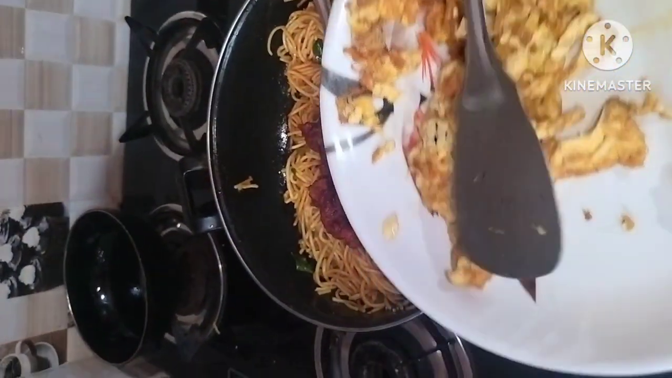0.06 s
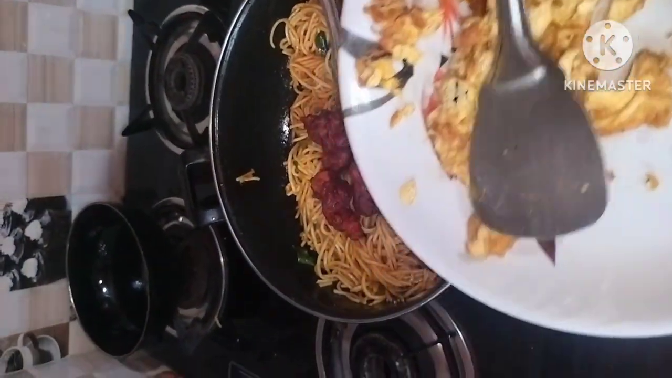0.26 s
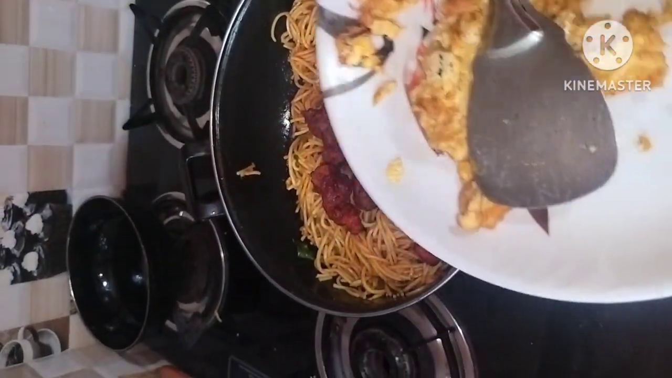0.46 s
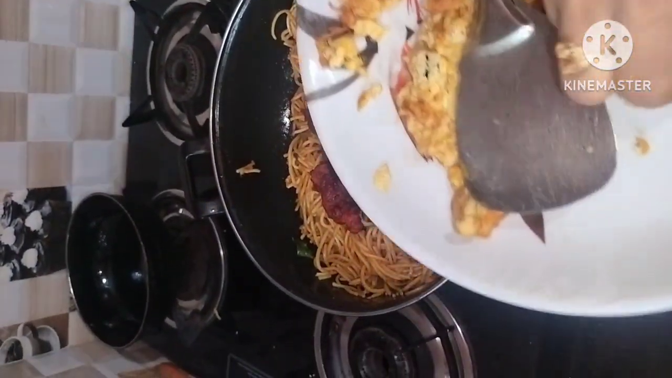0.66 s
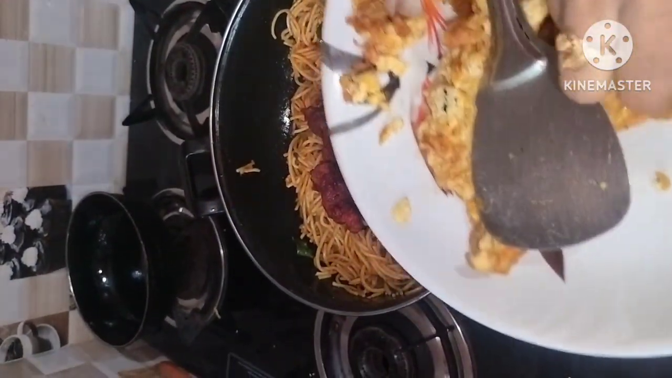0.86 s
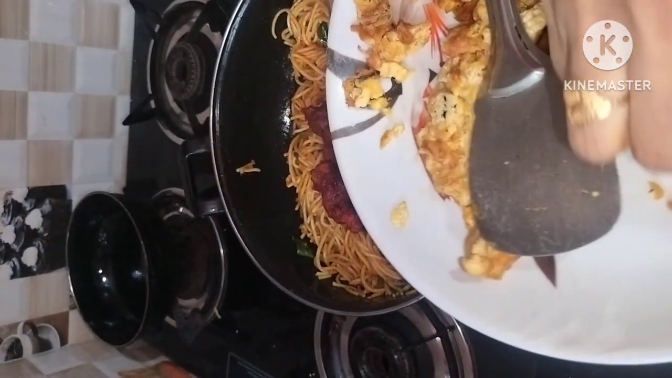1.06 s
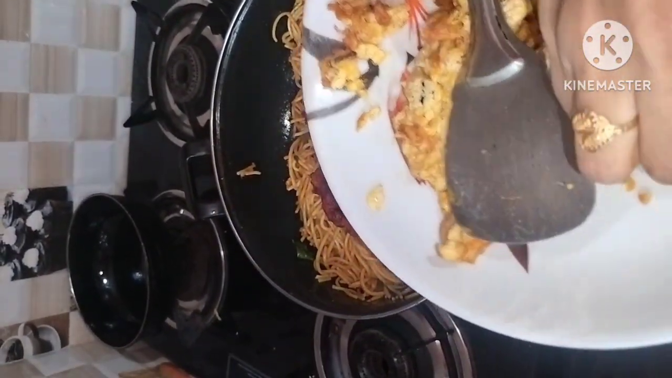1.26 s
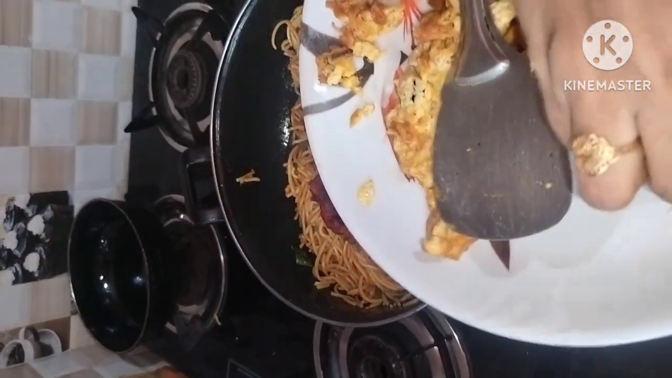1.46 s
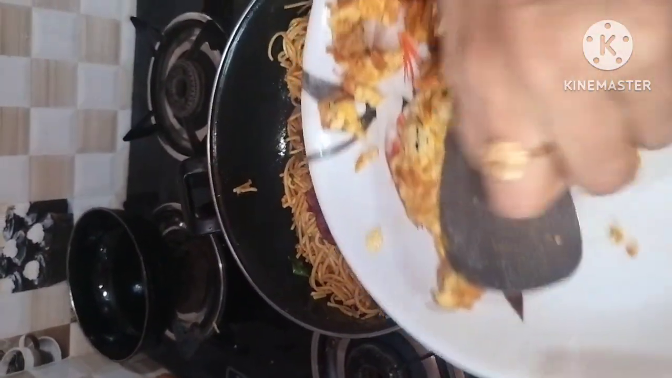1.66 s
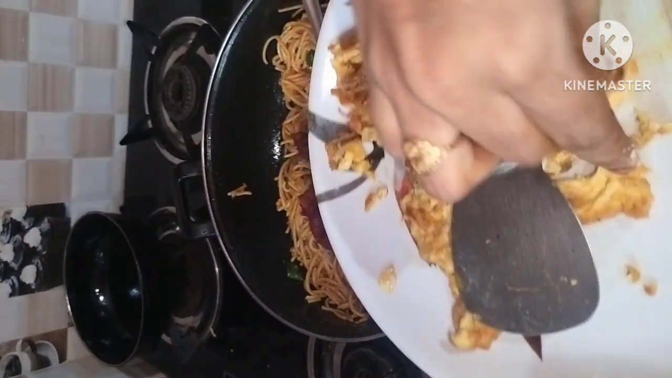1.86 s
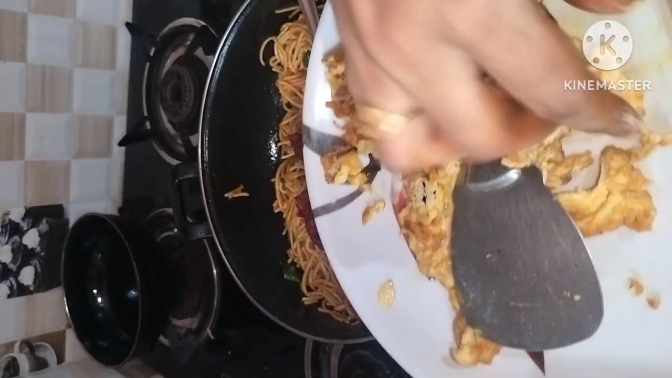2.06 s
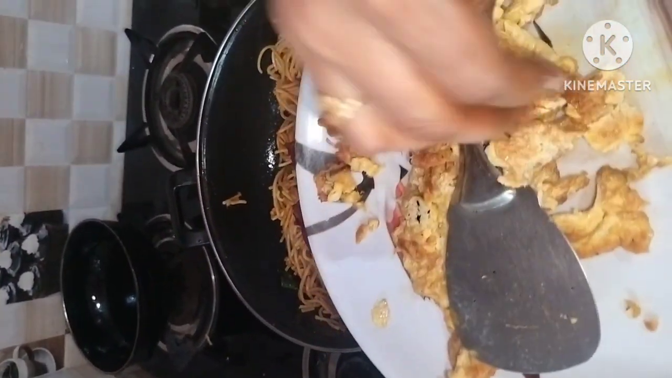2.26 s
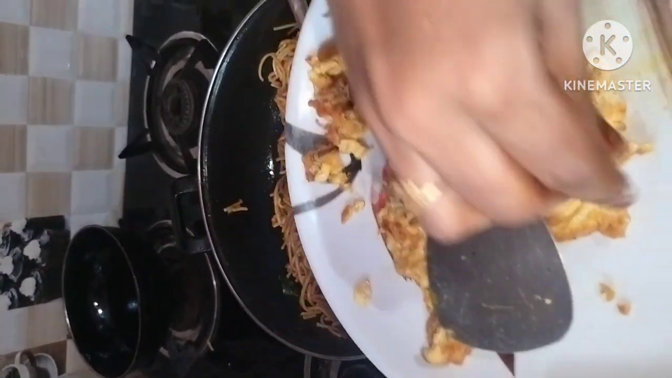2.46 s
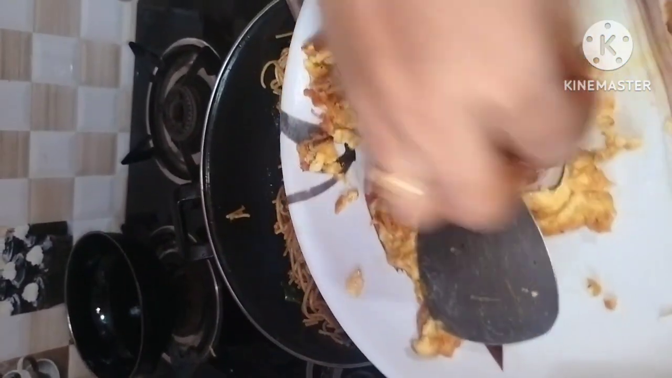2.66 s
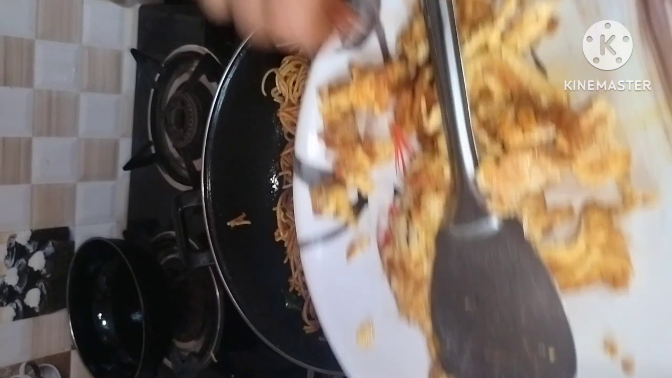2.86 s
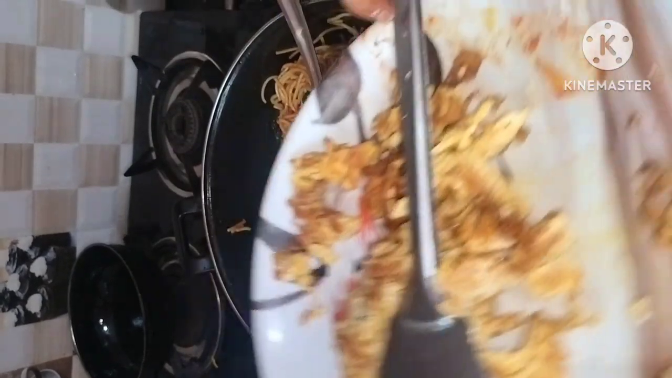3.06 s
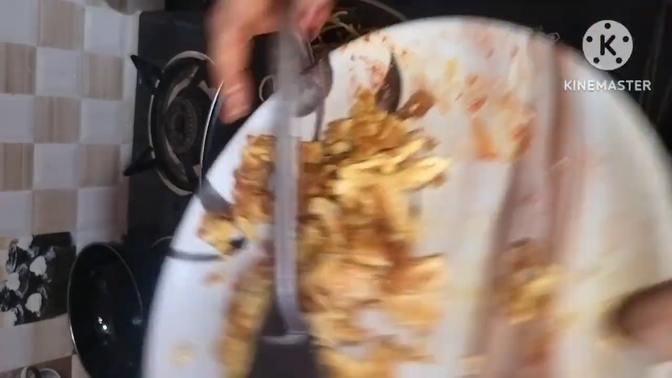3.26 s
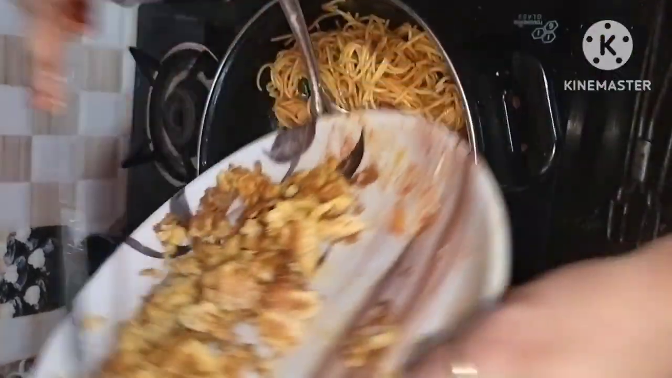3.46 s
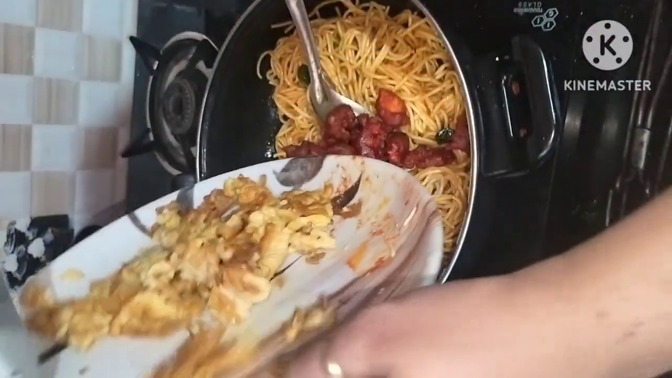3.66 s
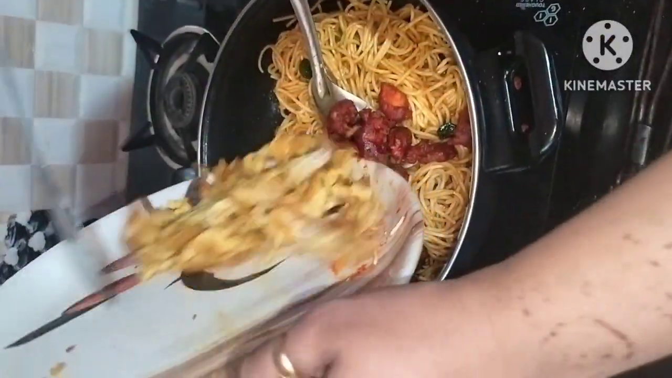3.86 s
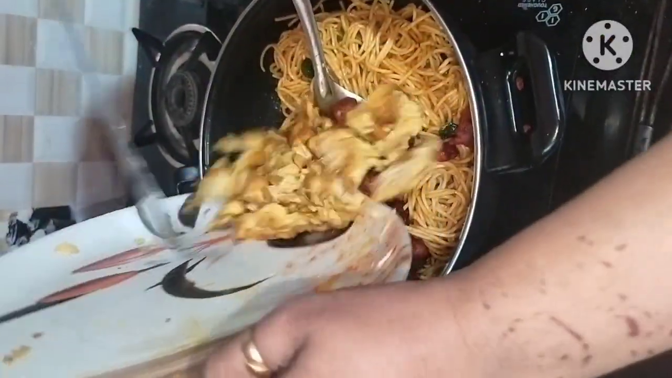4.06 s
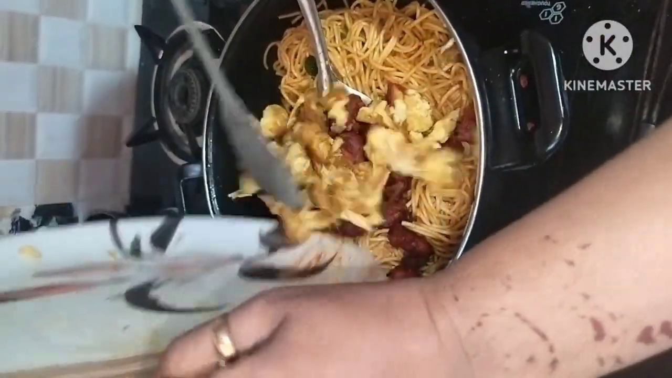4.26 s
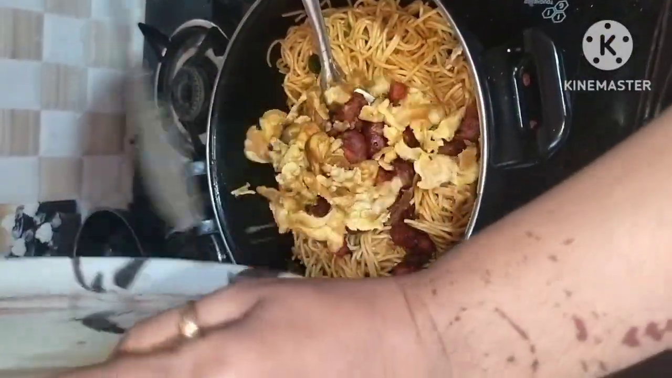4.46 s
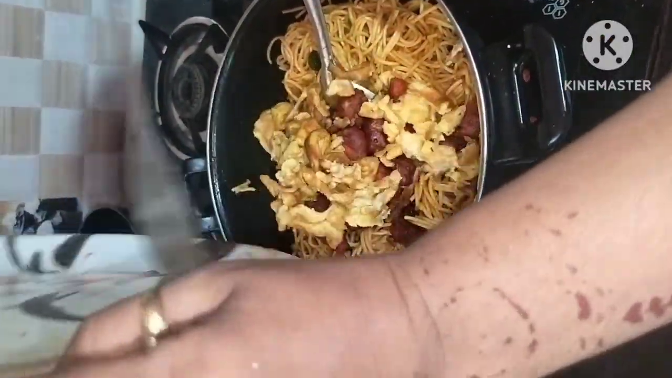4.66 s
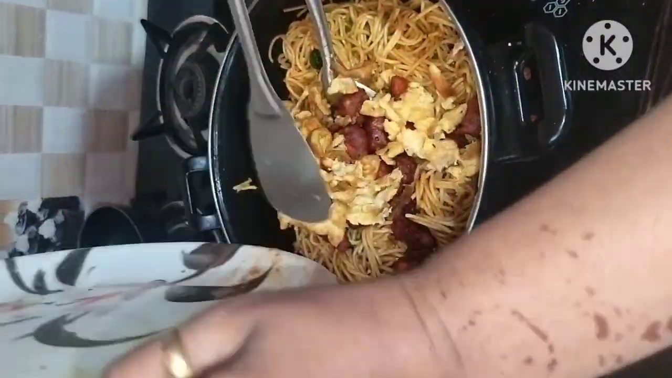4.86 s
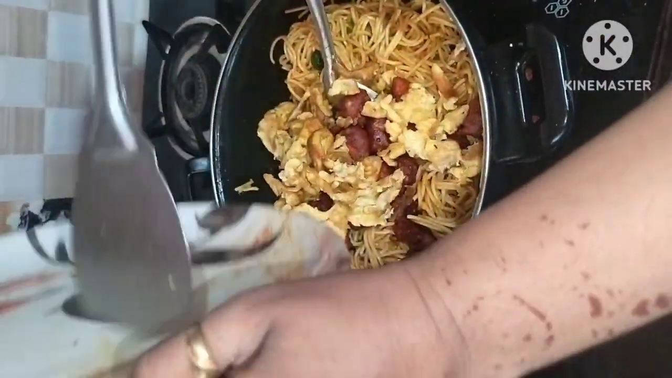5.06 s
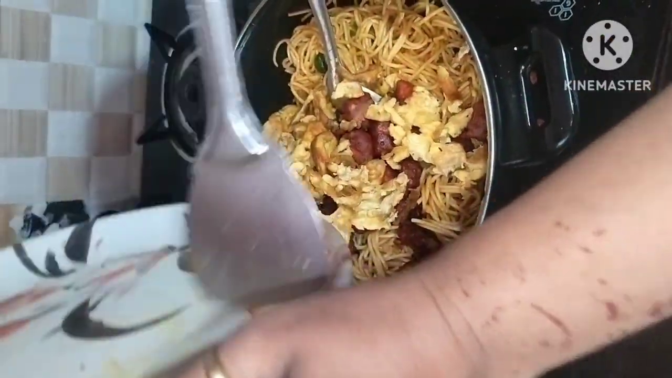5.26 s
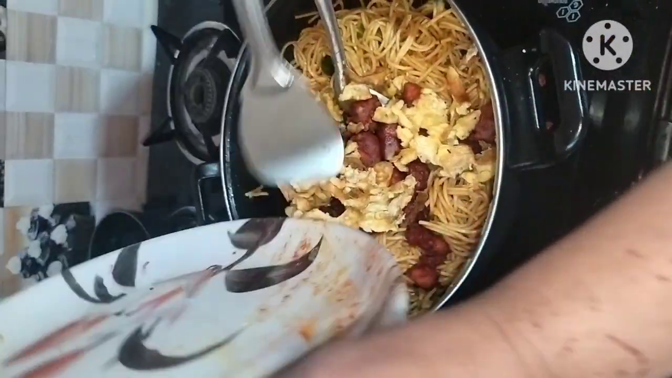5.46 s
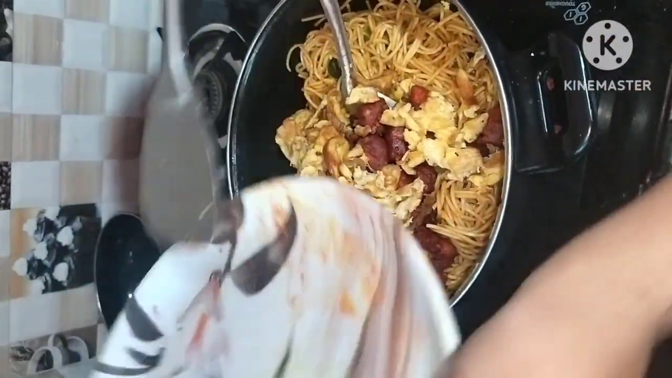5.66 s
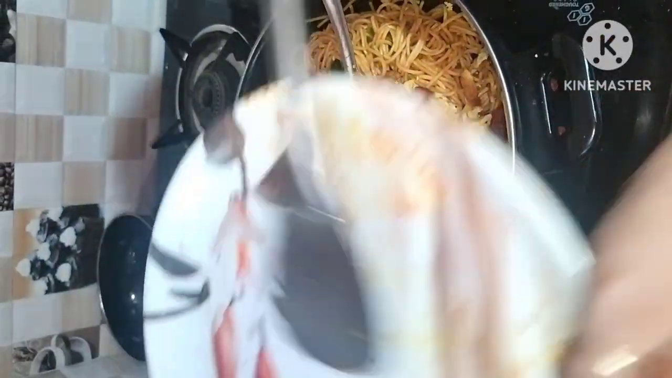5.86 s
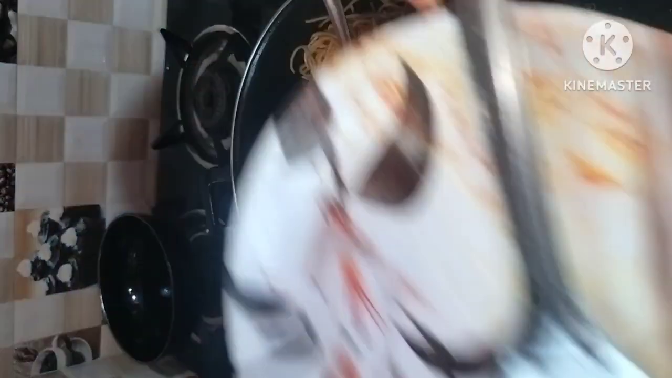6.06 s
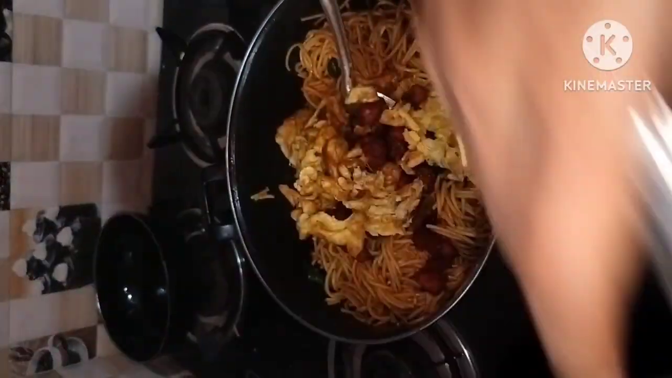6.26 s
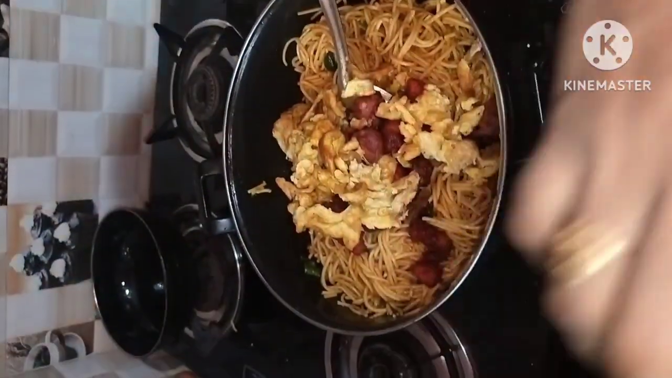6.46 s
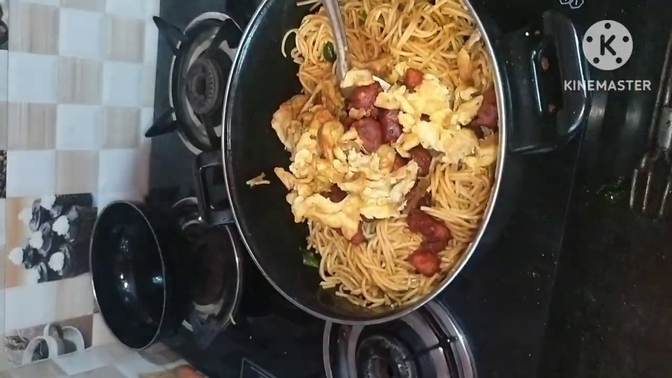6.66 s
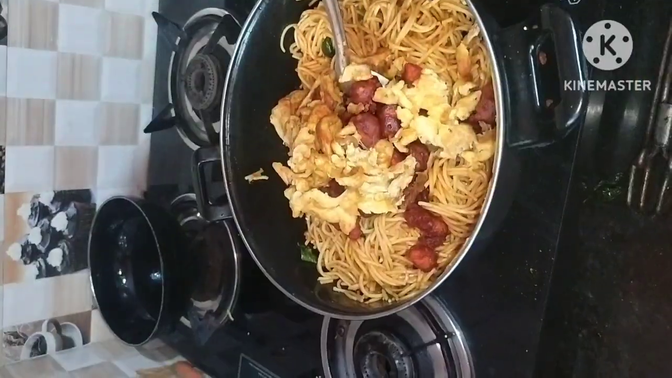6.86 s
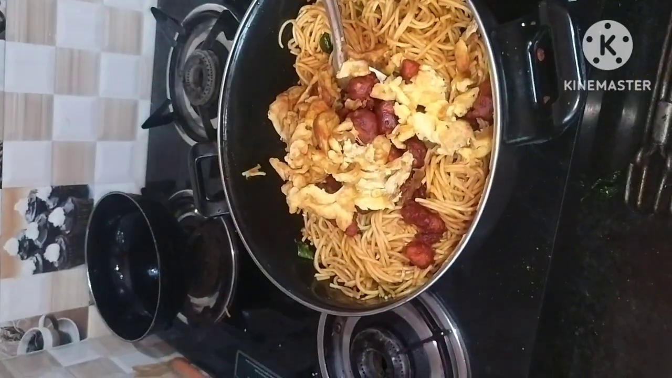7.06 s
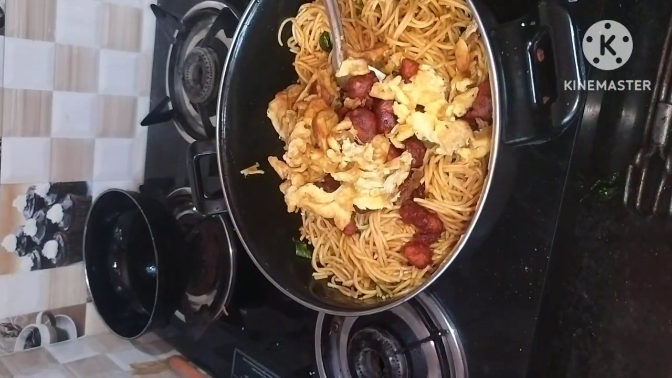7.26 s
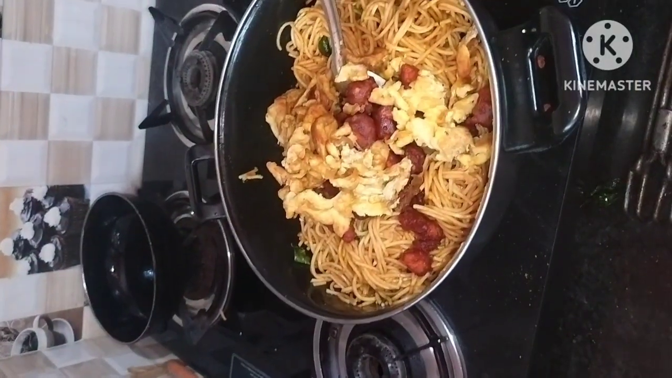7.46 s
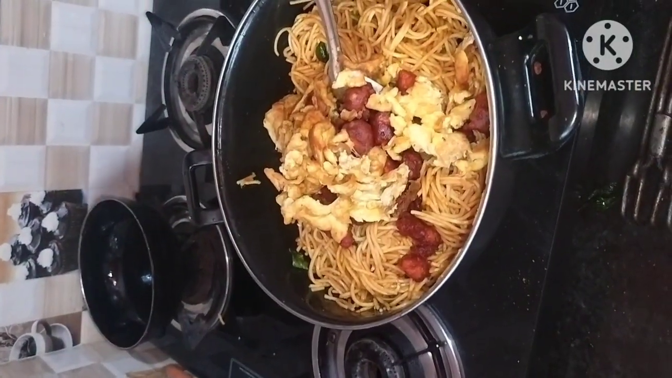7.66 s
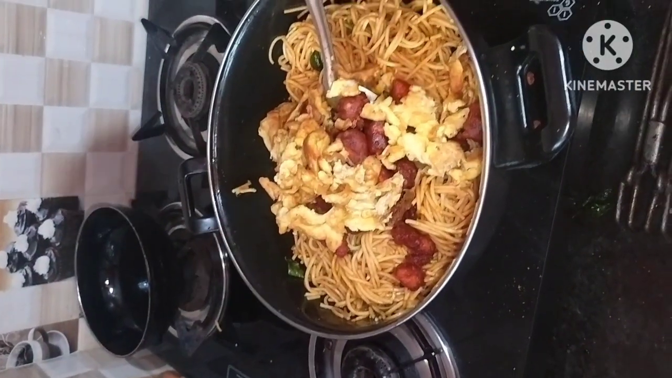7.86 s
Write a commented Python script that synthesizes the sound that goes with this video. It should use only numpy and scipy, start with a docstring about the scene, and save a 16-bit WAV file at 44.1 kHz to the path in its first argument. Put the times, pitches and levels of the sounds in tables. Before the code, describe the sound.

Noodles fry in a pan with a grainy, muffled midrange sizzle, growing gently over a low, wandering stove rumble and hollow pan hum. Tiny ticks dot the first second; a faint dull touch comes at 1.3 s. At 2.0 s a steel spatula clacks brightly on a plate, followed by duller knocks at 2.3-2.4 s and short gritty scrapes until 2.9 s, with a sharp tick and faint squeak near 2.7 s. The plate bumps the pan rim at 3.4 s and the pan rings at 3.9 s; the sizzle dips around 3.8 s and stays quieter under the egg. Spatula taps and scrapes follow at 4.0-4.2, 4.7 and 5.2-5.4 s. Plate and spatula are set down with a clatter at 6.3-6.7 s, including one crisp snap. Sizzle continues alone, fading quickly from 7.7 s. Close microphone, short tiled-room reverberation, nearly mono.

```python
"""Noodles sizzle in a pan on a gas stove: filtered grains and noise, growing as the pan heats, over a low rumble.
From 1.3 s a steel spatula knocks and rubs a plate to scrape egg off it: noise cracks, damped modes, slip grains.
At 3.4 s the plate bumps the pan; as it tips, the sizzle dips and settles lower under the egg.
More knocks and strokes follow, and from 6.3 s both are put down with a clatter; sizzle and rumble fade from 7.7 s.
Ticks, spits and faint squeaks occur throughout; a small tiled kitchen answers, dull and almost mono."""
import sys
import numpy as np
from scipy import signal
from scipy.fft import rfft, irfft, next_fast_len
from scipy.io import wavfile
from scipy.ndimage import uniform_filter1d, map_coordinates

SR = 44100
rng = np.random.default_rng(int(sys.argv[2]) if len(sys.argv) > 2 else 0)


def transcribe(u):
    """Save the signal u as a 16-bit wav file named by the first command-line argument.

    u: samples, shape (n,) or (channels, n), limited to [-1, 1]; the rate is SR.
    q: integer samples, one column per channel.
    """
    v = np.clip(np.atleast_2d(u).T, -1, 1)
    q = np.round(v * 32767).astype(np.int16)
    wavfile.write(sys.argv[1], SR, q)


N = 348831  # samples

# Relative spectrum of the sizzle: [f/Hz, density/dB per Hz]
SIZZLE_SPECTRUM = [(180, -36), (300, -11.5), (391, -19), (625, -5), (691, -4.5), (755, -0.5), (902, 2.5),
                   (1120, -4), (1240, 1.5), (1500, -2.5), (2160, 1), (3320, -7.5), (3960, -17),
                   (4790, -18.5), (6170, -36.5), (8020, -70.5), (13600, -120)]


def sizzle():
    """Countless steam bubbles burst under the noodles, in little flurries of shifting pitch."""
    bursts = grains(rate_hz=5000, spread_db=1.5)
    bursts = unit(bursts + 0.86 * rng.standard_normal(N))
    flurries = patchy(bursts, depth_db=2.5)
    fizz = unit(coloured(flurries, lambda hz: along(SIZZLE_SPECTRUM, hz)))
    in_room = unit(fizz + 0.37 * kitchen(fizz))
    flicker_db = 0.22 * wobble(30) + 0.3 * wobble(6.3)
    return in_room * amp(frying_db() + fade_db() + flicker_db)


FRY_DB, HEAT_DB_PER_S = -42.5, 1.42  # starting level, growth
TIP_S, TIP_LENGTH_S, COVERED_DB = 3.6, 0.2, -43.5  # plate tips (centre), level from then on
DIP_S, DIP_REACH_S, DIP_DEPTH_DB = 3.77, 0.098, 3.7  # egg slides


def frying_db():
    """Level of the frying: it grows with the heat, dips as the egg slides and settles lower under it."""
    t = np.arange(N) / SR
    covered = np.clip((t - TIP_S) / TIP_LENGTH_S + 0.5, 0, 1)
    level_db = (1 - covered) * (FRY_DB + HEAT_DB_PER_S * t) + covered * COVERED_DB
    return level_db - DIP_DEPTH_DB * swell(DIP_S, DIP_REACH_S)


FADE_S, FADE_STEP_DB, FADE_DB_PER_S = 7.668, 4.5, 25


def fade_db():
    """At the end the level drops by a step and falls steadily."""
    after_s = np.arange(N) / SR - FADE_S
    return -1 * (after_s > 0) * (FADE_STEP_DB + FADE_DB_PER_S * after_s)


# Blows: [t/s, level/dB, thump/dB, brightness/dB, clatter t60/s, ring/dB, rebound delay/s (0: none), struck thing]
BLOWS = [ (1.262, -37, 14.5, -8, 0.19, -13, 0, "damped plate"),
         (2.029, -21, 3, 11, 0.13, 4, 0.0019, "plate"),
         (2.266, -19, 10.5, -20, 0.061, -9.5, 0.00021, "damped plate"),
         (2.332, -29, 3, -18, 0.14, -0.5, 0, "damped plate"),
         (2.365, -31.5, 1, -19, .12, 0, 0.0016, "damped plate"),
         (2.425, -35, 10, -15, .2, -3, 0.0018, "damped plate"),
         (3.3749, -19, 9, 1, 0.25, 2.5, 0.0076, "pan rim"),
         (3.470, -20.5, 4, -11, 0.31, -4.5, 0.0007, "pan rim"), (3.858, -16.5, 3, -3.5, .2, 9, 0, "pan"),
         (3.995, -25, 9, 5.5, 0.46, -4.5, 0.00084, "spatula"),
         (4.169, -26.5, -15, 7.5, 0.17, -15, 0.0018, "spatula"),
         (4.646, -18.5, 8, 1.5, 0.19, -1, 0.0026, "plate edge"),
         (4.752, -28, 10, -15, 0.18, -5, 0.00016, "damped plate"),
         (5.379, -19.5, 5, 1.5, 0.34, 1, 0.012, "spatula"),
         (6.277, -20.5, 1.5, -3, 0.45, -1, 0.0011, "damped plate"),
         (6.320, -25.5, -3, -6, 0.58, 1, 0.00068, "damped plate"),
         (6.573, -18.5, -8, -10.5, 0.38, 0, 0.0065, "handle"),
         (6.629, -28.5, 3, -11, 0.33, 3, 0.00051, "handle"),
         (6.670, -24, 0.5, -1, 0.28, 9, 0.0033, "handle")]
# First touch of a rebounding blow: level and ring relative to the blow, clatter decay
TOUCH_DB, TOUCH_RING_DB, TOUCH_T60_S = 0, -7, 0.07


def blows():
    """A blow without a rebound lands once; one with a rebound touches drily, rebounds and lands again to ring."""
    track = np.zeros(N)
    for s, db, thump_db, bright_db, t60_s, ring_db, rebound_s, body in BLOWS:
        if rebound_s > 0:
            touch = strike(body, thump_db, bright_db, TOUCH_T60_S, ring_db + TOUCH_RING_DB)
            add(track, s, amp(db + TOUCH_DB) * touch)
        landing = strike(body, thump_db, bright_db, t60_s, ring_db)
        add(track, s + rebound_s, amp(db) * landing)
    return track


# Modes of the plate struck on its face: [f/Hz, level/dB, t60/s]
PLATE = [(339.6, -3.5, 0.15), (665, 5, 0.12), (838, 8.5, 0.04), (1430, -6, 0.37), (1450, -4.5, 0.13),
         (1874, 3.5, 0.25), (2436, -5, 0.38), (2800, -27, 0.33), (2880, 0, 0.17), (3140, -18, 0.13),
         (3577, -27, 0.44), (3900, -18, 0.11), (4040, -38, 0.41), (5000, -18.5, 0.16)]
# Modes of the plate struck on its edge: [f/Hz, level/dB, t60/s]
PLATE_EDGE = [(256, -1.5, 0.39), (309, -4.5, 0.39), (403, -4, 0.17), (524, 1, 0.12), (840, -8, .12),
              (1140, -2, .12), (1248, -2.5, .14), (1400, 2, 0.18), (1750, -5.5, .35), (2020, -3, 0.2),
              (2360, -3, 0.17), (2500, -7, .2), (3230, 8, 0.1), (3800, -19, .2), (4350, -26.5, 0.25)]
# Modes of the plate damped by food or counter: [f/Hz, level/dB, t60/s]
DULL_BODY = [(197.3, -6, .35), (352.5, -4.5, 0.2), (500, 1, 0.46), (630, -4, .2), (691, 6, 0.18),
             (785, 8.5, 0.14), (1096, -8.5, 0.96), (1374, -4.5, 0.56), (1794, 8.5, 0.15), (1930, -3, .3),
             (2270, -11, 0.32), (2470, -7.5, .25), (2740, -21, 0.32), (3930, -37, .25)]
# Modes of the pan: [f/Hz, level/dB, t60/s]
PAN = [(162.2, 11, 0.36), (335.3, -1, 0.19), (510, -11.5, 0.41), (576, 1, 0.13), (819, 6.5, 0.11),
       (1060, -5.5, 0.18), (1230, -15, 0.17), (1340, -19, .35), (1660, -18.5, .35), (2000, 5, 0.07),
       (2103, -1, 0.062), (2300, -11.5, 0.22), (2430, -23, .3), (2790, -23, .3), (3305, -23, 0.16)]
# Modes of the pan's rim: [f/Hz, level/dB, t60/s]
RIM = [(164.7, -1.5, 0.28), (232, -5, 0.27), (295, -1.5, 0.15), (514, -5.5, 0.4), (810, 3.5, 0.14),
       (960, 7.5, 0.074), (1080, -4, 0.34), (1344, -14, 0.47), (1580, -11, 0.41), (2020, -6, 0.21),
       (1990, 3, 0.1), (2130, 0, 0.29), (2310, -13, 0.27), (2465, -11.5, 0.5), (2804, -5, 0.19),
       (3350, -19, 0.2), (3500, -8.5, 0.17), (4580, -15, 0.12)]
# Modes of the steel spatula, struck or rubbed: [f/Hz, level/dB, t60/s]
SPATULA = [(259.7, -5, 0.25), (293.5, -10, 0.25), (371, -7, 0.36), (473, -1.5, 0.18), (716, -5, .4),
           (804, -11.5, .35), (1005, -9, 0.23), (1242, -5.5, 0.34), (1348, -7, 0.56), (1440, -5.5, .25),
           (1602, -5.5, 0.25), (1770, -5, .3), (1936, -3, .3), (2077, 0.5, 0.29), (2180, -6, .3),
           (2310, 1, .3), (2367, 0.5, 0.22), (2440, -5.5, 0.32), (2810, -6, .25), (2950, -13.5, 0.2),
           (3260, -15, .2), (3330, -8, .25), (4270, -23.5, .35), (5000, -25.5, 0.31)]
# Modes of the handle: [f/Hz, level/dB, t60/s]
HANDLE = [(1691, -6.5, .22), (1800, 3.5, 0.13), (1947, -1.5, .22), (2010, -4, 0.15), (2190, -0.5, 0.16),
          (2360, -11, 0.32), (2965, -7.5, 0.17), (3300, -10, 0.16), (4330, -28, 0.19), (4570, -31.5, 0.22)]
# Struck things by name: [modes, crack/dB, clatter/dB, low cutoff/Hz]
BODIES = { "plate": (PLATE, 0, -9.5, 220), "plate edge": (PLATE_EDGE, 1.7, -9.5, 150),
          "damped plate": (DULL_BODY, -2.2, -4, 198), "pan": (PAN, -2.5, -9, 270),
          "pan rim": (RIM, -1.2, -1.9, 140), "spatula": (SPATULA, -2.8, -2.5, 233),
          "handle": (HANDLE, -12, -0.67, 170)}
SNAP_DB = -15.5  # click re blow, before a dull blow lowers it


def strike(body, thump_db, bright_db, t60_s, ring_db):
    """One contact: a click, a short crack, a chattering crowd of weak modes and the struck thing's clear modes."""
    modes, crack_db, clatter_db, cutoff_hz = BODIES[body]
    t = np.arange(SR * 2 // 3) / SR

    def size_db(hz):
        """A small object radiates little bass."""
        return -10 * np.log10(1 + (cutoff_hz / (hz + 20)) ** 8)

    def dense_db(hz):
        """A heavy contact adds bass, a hard one treble; each spot favours other modes."""
        thump = thump_db / (1 + (hz / 700) ** 2)
        brightness = bright_db * hz ** 2 / (hz ** 2 + 2200 ** 2)
        spot = 3.5 * ripple(hz, spacing_hz=65)
        return contact_db(hz) + thump + brightness + spot + size_db(hz)

    crack = amp(crack_db - 60 * t / 0.014)
    chatter = amp(3.0 * wobble(130, count=len(t)))
    clatter = chatter * amp(clatter_db - 60 * t / max(t60_s, 0.01))
    dense = 2 * coloured((crack + clatter) * rng.standard_normal(len(t)), dense_db)
    click = amp(SNAP_DB + min(bright_db, 0)) * (t == 0)
    return click + dense + amp(ring_db) * coloured(ring(modes, t), size_db)


JOSTLE_HZ, JOSTLE_PER_S = 14.8, 400  # rms pitch shift at the knots, knot rate


def ring(modes, t):
    """Damped modes at new strengths and phases, starting near rms 1; hand and food jostle each pitch."""
    hz, db, t60_s = np.transpose(modes)[:, :, None]
    gain = amp(db + 1.5 * rng.standard_normal(hz.shape))
    knots = np.arange(0, 1, 1 / JOSTLE_PER_S)
    shake = np.array([np.interp(t, knots, row) for row in rng.standard_normal((len(hz), len(knots)))])
    jostle_turns = JOSTLE_HZ * np.cumsum(shake, axis=1) / SR
    turns = hz * t + rng.random(hz.shape) + jostle_turns
    waves = np.sin(2 * np.pi * turns) * amp(-60 * t / t60_s)
    onset = (1 - np.exp(-t / 0.00076)) ** 2
    return (gain * waves).sum(0) / np.sqrt(np.sum(gain ** 2) / 2) * onset


# Crowd of weak modes in any contact: [f/Hz, density/dB per Hz]
CLATTER = [(50, -36.5), (120, -3.5), (180, -6.5), (750, -6.5), (1100, -1.5), (1600, -0.5), (2200, 0),
           (3300, -4.5), (3900, -13.5), (5000, -20.5), (5600, -28.5), (7500, -45), (13500, -59),
           (15500, -79)]
# Cookware resonances colouring contacts: [f/Hz, half width/Hz, lift/dB]
COOKWARE = [(544, 11, 7), (730, 120, 9), (1040, 15, -2), (1370, 24, 1.5), (1896, 27, 7), (2036, 62, 5.5),
            (2276, 31, 5.5), (2940, 70, 2), (3270, 260, 3), (4340, 70, 3.5), (4910, 110, 6.5),
            (5950, 39, 7)]


def contact_db(hz):
    """Spectrum of a touch between utensils: the weak modes lifted at the cookware's resonances."""
    lift_db = sum(db / (1 + ((hz - centre) / width) ** 2) for centre, width, db in COOKWARE)
    return along(CLATTER, hz) + lift_db


# Spatula strokes: [t of hardest push/s, reach/s, level/dB, plate re steel/dB, rasp re ringing/dB]
STROKES = [(2.24, 0.052, -34.5, 10, -3), (2.36, 0.11, -35.5, 21, -12), (2.507, .09, -37.5, -5, -1),
           (2.733, 0.14, -30.5, 4, 0.5), (2.848, .045, -41, 22, -1), (3.313, 0.22, -42.5, 12, -2.5),
           (4.036, 0.07, -30, -4, -5), (4.13, 0.061, -35.5, -20, 10), (4.712, 0.062, -32.5, -10, -4),
           (5.167, 0.073, -36.5, -12, -3), (6.527, 0.15, -37, -13, -11.5)]
# Modes of the rubbed plate: [f/Hz, level/dB, t60/s]
RUBBED_PLATE = [(162, -6.5, 0.24), (350, -9.5, 0.24), (556, -5.5, 0.32), (698.4, -4.5, 0.28),
                (771, 2, 0.12), (897, -2.5, 0.075), (1030, -7.5, 0.11), (1270, -5, 0.073),
                (1510, -14.5, 0.087), (1906, 1, 0.15), (2170, -1, 0.3), (2337, -1, 0.065),
                (2630, -5, 0.024)]
# Rasp of the edge over a plain touch: [f/Hz, gain/dB]
GRIT = [(200, -16), (800, 2.5), (2200, 2), (4500, 7), (8000, 1.5), (13000, -5.5)]


def scraping():
    """The blade slips in tiny jerks that set steel and plate ringing; crumbs crunch under its edge."""
    slips = grains(rate_hz=1800, spread_db=1) * amp(3 * wobble(70))
    t = np.arange(SR // 6) / SR
    rasp = unit(coloured(slips, lambda hz: contact_db(hz) + along(GRIT, hz)))
    steel_ring = ring(SPATULA, t) * amp(-60 * t / 0.38)  # extra damping
    steel = unit(signal.fftconvolve(slips, steel_ring)[:N])
    steel = unit(coloured(steel, lambda hz: -14 / (1 + (hz / 1100) ** 2)))  # less bass
    plate = unit(signal.fftconvolve(slips, ring(RUBBED_PLATE, t))[:N])
    track = np.zeros(N)
    for s, reach_s, db, plate_db, rasp_db in STROKES:
        ringing = unit(steel + amp(plate_db) * plate)
        stroke = unit(amp(rasp_db) * rasp + ringing)
        track += amp(db) * swell(s, reach_s) * stroke
    return track


# Dry ticks, spits of fat and clicks: [t/s, peak/dB, f/Hz]
TICKS = [(0.169, -28, 4500), (0.59, -29, 3830), (1.196, -28, 4100), (2.77, -12.5, 1900),
         (3.21, -17.5, 1237), (3.24, -22, 3330), (4.32, -24, 1160), (5.761, -22, 2800), (6.153, -22, 1600),
         (6.63, -8, 2242), (7.055, -28.5, 3640), (7.693, -25.5, 1050)]


def ticks():
    """Small dry contacts, spits and clicks: a snap with a cycle or two of ring."""
    track, t = np.zeros(N), np.arange(SR // 30) / SR
    for s, db, pitch_hz in TICKS:
        snap = np.sin(2 * np.pi * pitch_hz * t) * np.exp(-t * pitch_hz / 0.6)
        snap = coloured(snap, lambda hz: 0.65 * along(CLATTER, hz))
        add(track, s, amp(db) * snap / np.abs(snap).max())
    return track


# Brief squeaks: [t of centre/s, reach/s, level before flutter/dB, mean f/Hz]
SQUEAKS = [(1.554, 0.1, -43, 719), (2.713, 0.031, -28, 1030), (4.81, 0.054, -41, 1744),
           (7.685, 0.034, -38.5, 988.5), (7.751, 0.042, -41.5, 1910)]


def squeaks():
    """Short, faint sine notes, unsteady in pitch and level."""
    drift = 1 + 0.018 * wobble(220)
    flutter = amp(3 * wobble(110))
    seconds = np.cumsum(drift) / SR  # unsteady clock
    notes = sum(amp(db) * swell(s, reach_s) * np.sin(2 * np.pi * hz * seconds)
                for s, reach_s, db, hz in SQUEAKS)
    return flutter * notes


# Relative spectrum of the rumble: [f/Hz, density/dB per Hz]
STOVE_SPECTRUM = [(20, -16), (45, -0.5), (60, -4.5), (78, 7), (105, 1), (140, -19.5), (300, -16.5),
                  (900, -60.5)]
# Course of the rumble, before RUMBLE_DB: [t/s, level/dB]
RUMBLE_COURSE = [(0.0, -68), (0.78, -70.5), (1.52, -63.5), (2.51, -65), (3.27, -53.5), (3.57, -70.5),
                 (3.82, -66.5), (4.05, -61.5), (5.62, -64), (5.87, -60), (6.71, -60), (6.88, -66),
                 (7.5, -59), (7.58, -59)]
# Relative spectrum of the pan's low hum: [f/Hz, density/dB per Hz]
HOLLOW_SPECTRUM = [(90, -28), (130, -1.5), (162, 5), (200, -4.5), (235, -5), (280, -1.5), (340, -13.5),
                   (500, -12), (900, -54)]
RUMBLE_DB, HUM_DB = 3, -14.5  # rumble re its course, hum re frying level


def stove():
    """A low, wandering rumble, likely from the burner, and the hollow hum of the pan, over a trace of hiss."""
    rumble = patchy(rng.standard_normal(N), depth_db=1.0)
    rumble = unit(coloured(rumble, lambda hz: along(STOVE_SPECTRUM, hz)))
    hum = patchy(rng.standard_normal(N), depth_db=4.0)
    hum = unit(coloured(hum, lambda hz: along(HOLLOW_SPECTRUM, hz)))
    hiss = amp(-91) * rng.standard_normal(N)
    rumble_db = curve(RUMBLE_COURSE) + RUMBLE_DB + fade_db()
    return rumble * amp(rumble_db) + hum * amp(frying_db() + HUM_DB) + hiss


# Reverberation of the tiled kitchen: [f/Hz, t60/s]
KITCHEN_T60 = [(150, 0.42), (800, 0.64), (2500, 0.42), (6000, 0.4), (14000, 0.42)]


def kitchen(x):
    """The tiled room's answer: a noise tail whose decay depends on frequency, longest near 800 Hz."""
    hz, t, z = signal.stft(rng.standard_normal(SR * 2 // 3), SR, nperseg=256)
    decay = amp(-60 * t / along(KITCHEN_T60, hz)[:, None])
    tail = signal.istft(z * decay, SR, nperseg=256)[1]
    tail *= 1 - np.exp(-np.arange(len(tail)) / SR / 0.008)
    return signal.fftconvolve(x, tail / np.linalg.norm(tail))[:N]


def amp(db):
    """Decibels to gain."""
    return 10 ** (np.asarray(db) / 20)


def unit(x):
    """x at rms 1."""
    return x / np.sqrt(np.mean(x ** 2) + 1e-20)


def along(points, hz):
    """(Hz, value) points read on a log frequency axis."""
    f, v = np.transpose(points)
    return np.interp(np.log(hz + 1), np.log(f + 1), v)


def curve(rows):
    """(s, value) rows at every sample."""
    return np.interp(np.arange(N) / SR, *np.transpose(rows))


def wobble(rate_hz, count=N):
    """A smooth random curve, rate_hz knots a second."""
    knots = rng.standard_normal(int(count * rate_hz / SR) + 4)
    return map_coordinates(knots, [np.arange(count) * rate_hz / SR])


def ripple(hz, spacing_hz):
    """Random peaks and valleys along frequency."""
    return map_coordinates(rng.standard_normal(1024), [hz / spacing_hz], mode="mirror")


def swell(s, reach_s):
    """A bell-shaped push centred on s, 17 dB down at reach_s either side."""
    return np.exp(-2 * ((np.arange(N) / SR - s) / reach_s) ** 2)


def grains(rate_hz, spread_db):
    """Tiny random impulses, together at rms 1, a few much larger than the rest."""
    spread = np.minimum(rng.exponential(size=N), 2 * np.pi)
    sizes = amp(spread_db * spread) * rng.standard_normal(N)
    return unit(sizes * (rng.random(N) < rate_hz / SR))


def patchy(x, depth_db):
    """x with small random patches of gain in time and frequency."""
    z = signal.stft(x, nperseg=1024)[2]
    field = uniform_filter1d(rng.standard_normal(z.shape), size=2, axis=0)
    field = uniform_filter1d(field, size=5, axis=1)
    return signal.istft(z * amp(depth_db * unit(field)), nperseg=1024)[1][:N]


def coloured(x, gain_db):
    """x through the causal minimum-phase filter with gain gain_db(hz)."""
    size = 2 * next_fast_len(len(x) // 2 + 4096)
    gain = amp(gain_db(np.fft.rfftfreq(size, 1 / SR)))
    cepstrum = irfft(np.log(gain + 1e-6), size)
    cepstrum[1:size // 2] *= 2  # fold to positive time
    cepstrum[size // 2 + 1:] = 0
    return irfft(rfft(x, size) * np.exp(rfft(cepstrum)), size)[:len(x)]


def add(track, s, sound):
    """Mix a sound into the track at time s."""
    part = track[max(round(s * SR), 0):][:len(sound)]
    part += sound[:len(part)]


def scene():
    """Utensils and frying in the room; the two channels differ only slightly."""
    utensils = blows() + ticks() + scraping() + squeaks()
    mid = utensils + amp(-8.5) * kitchen(utensils) + sizzle() + stove()
    side = amp(-33.0) * kitchen(mid)
    balance_db = [[-0.45], [0.45]]
    return np.array([mid + side, mid - side]) * amp(balance_db)


TOP_HZ = 15500


def record(dry):
    """Peaks are rounded softly; nothing passes above the band limit."""
    rounded = dry / (1 + np.abs(dry / 0.75) ** 6) ** (1 / 6)
    size = next_fast_len(N + SR // 2)
    in_band = np.fft.rfftfreq(size, 1 / SR) < TOP_HZ
    return irfft(rfft(rounded, size) * in_band, size)[:, :N]


dry = scene()
out = record(dry)
transcribe(out)
```